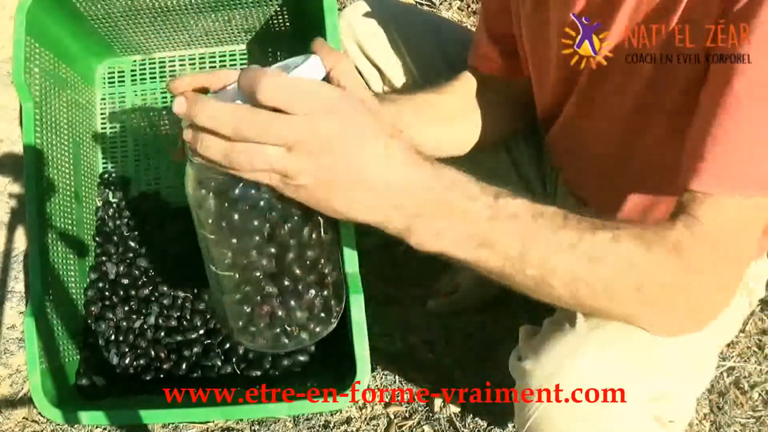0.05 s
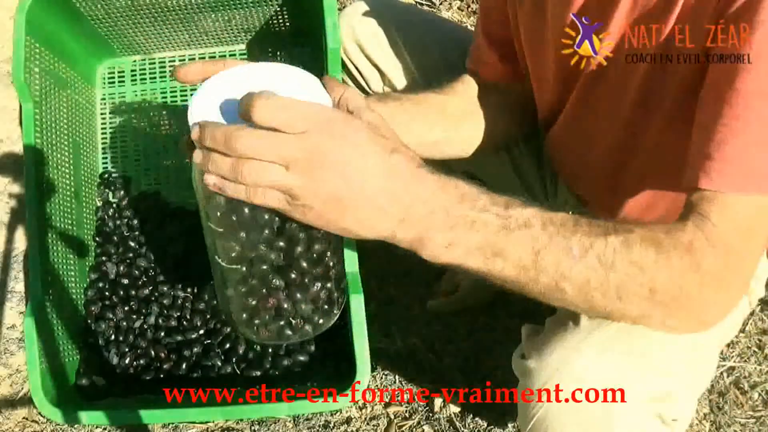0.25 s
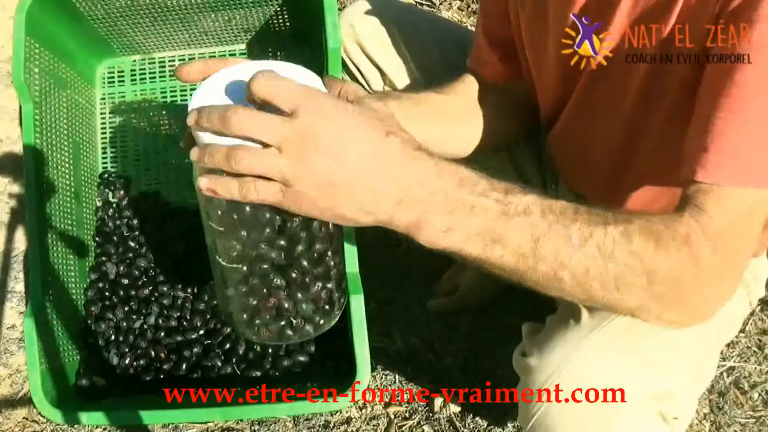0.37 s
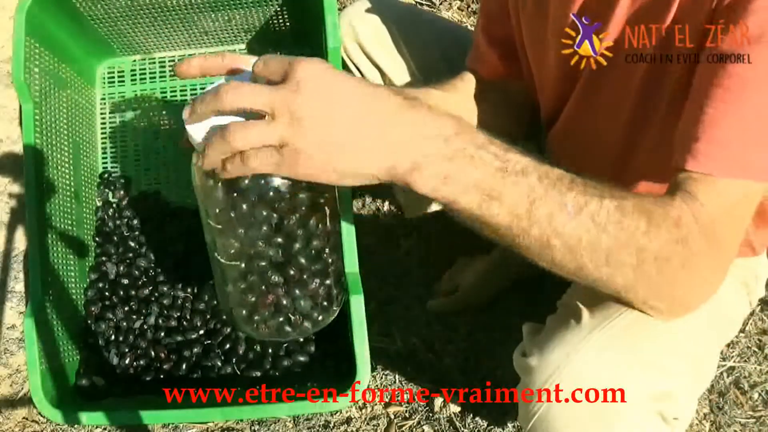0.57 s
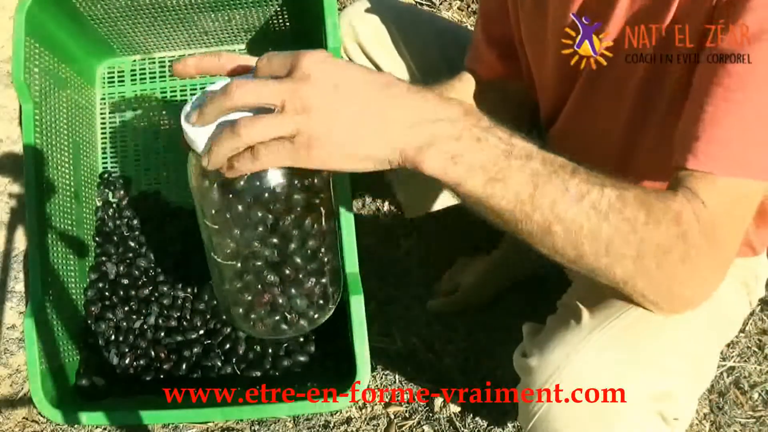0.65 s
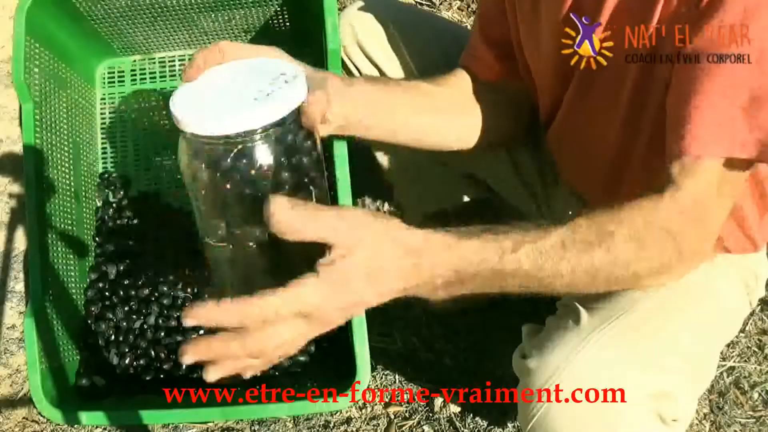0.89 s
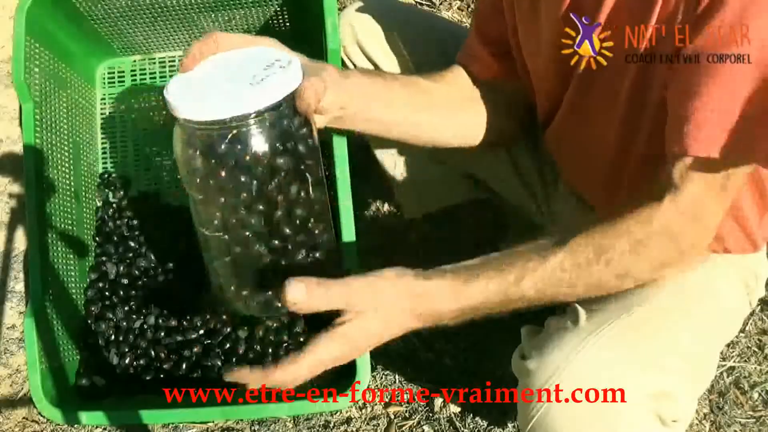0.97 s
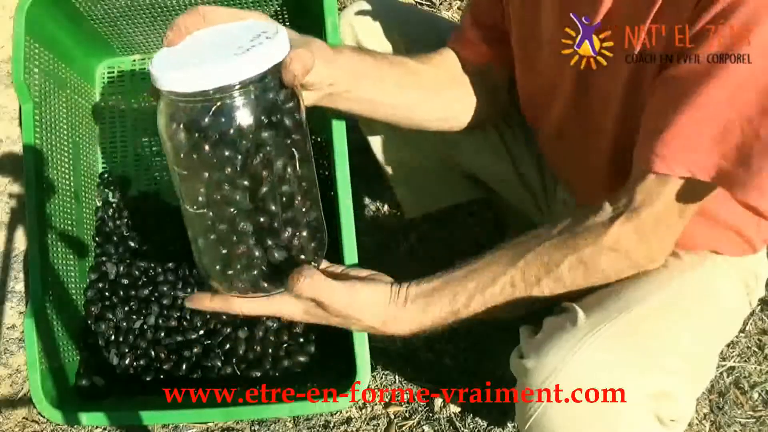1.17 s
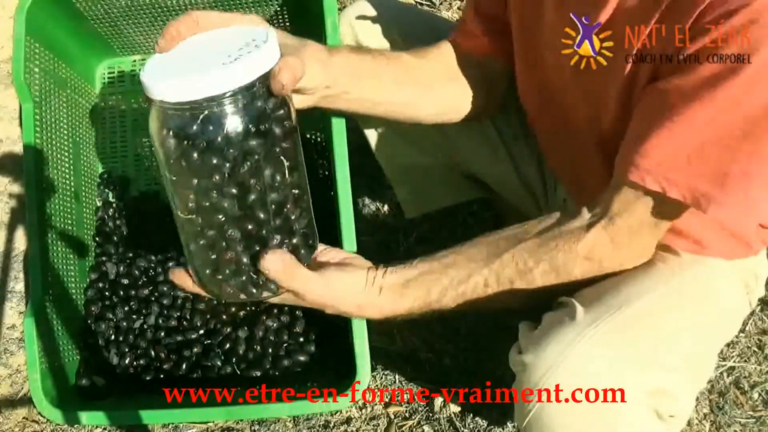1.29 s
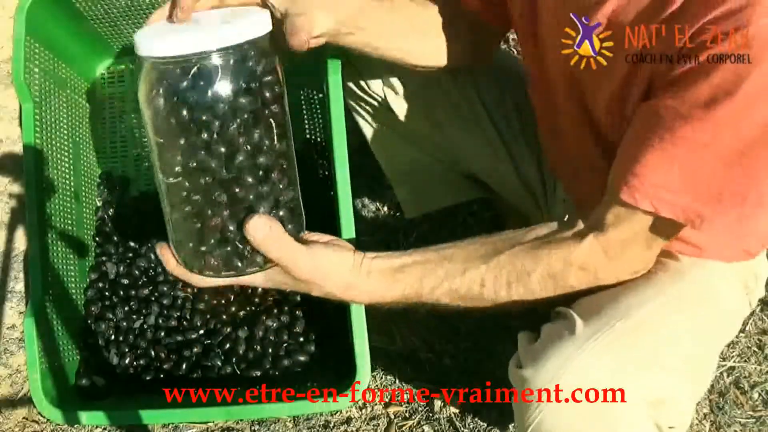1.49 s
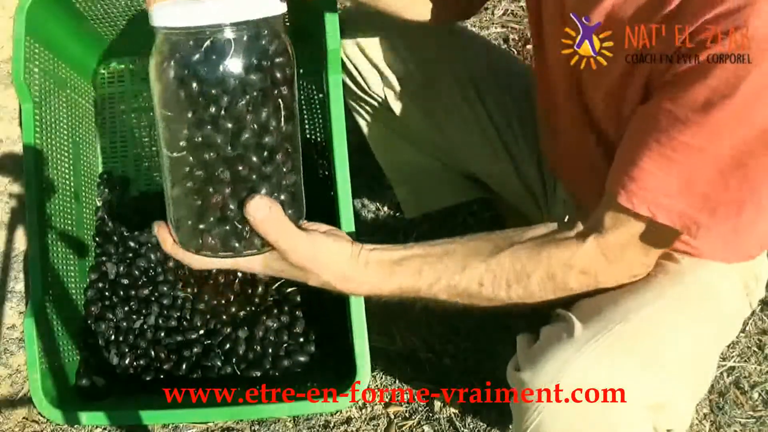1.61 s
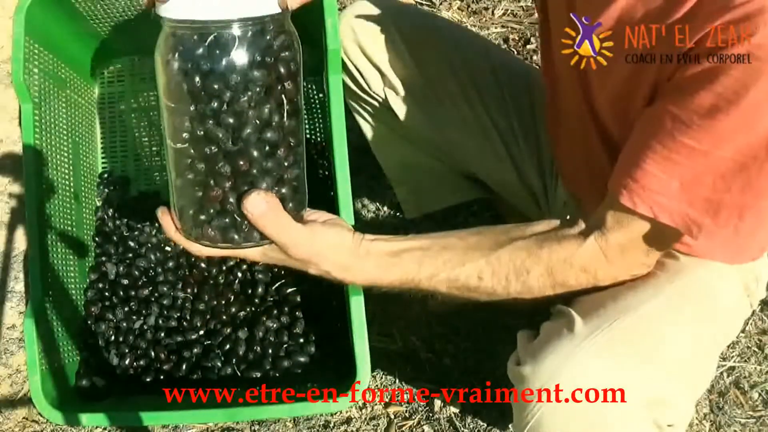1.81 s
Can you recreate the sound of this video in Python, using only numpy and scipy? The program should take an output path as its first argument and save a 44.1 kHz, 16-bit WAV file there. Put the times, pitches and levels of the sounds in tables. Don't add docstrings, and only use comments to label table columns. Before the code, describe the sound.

A sheet-metal lid taps sharply on a glass jar rim, drops onto the thread, chatters and scrapes as it turns, then dulls to small ticks; soft sleeve rustle follows, close microphone outdoors in faint air.

```python
import sys
import numpy as np
from scipy import signal
from scipy.fft import rfft, irfft, next_fast_len
from scipy.io import wavfile
from scipy.ndimage import uniform_filter1d, map_coordinates

SR = 44100
rng = np.random.default_rng(int(sys.argv[2]) if len(sys.argv) > 2 else 0)


def gain_from_decibels(decibels):
    exponent = np.asarray(decibels, float) / 20
    return 10 ** exponent


def generate_wav(signal):
    frames = np.transpose(np.atleast_2d(signal))
    scaled = np.clip(frames, -1, 1) * 32767
    pcm = np.round(scaled).astype(np.int16)
    wavfile.write(sys.argv[1], SR, pcm)


N = 81585


def unit(x):
    return x / np.sqrt(np.mean(x ** 2) + 1e-20)


def along(points, hz):
    point_hz, value = np.transpose(points)
    return np.interp(np.log(hz + 1), np.log(point_hz + 1), value)


def curve(rows, outside=None):
    start_s, value = np.transpose(rows)
    return np.interp(np.arange(N) / SR, start_s, value, outside, outside)


def wobble(rate_hz):
    knots = rng.standard_normal(N // 50)
    return map_coordinates(knots, [np.arange(N) * rate_hz / SR])


def filtered(x, response):
    size = next_fast_len(N + 8192)
    hz = np.fft.rfftfreq(size, 1 / SR)
    return irfft(rfft(x, size) * response(hz), size)[..., :N]


def highpass(x, hz):
    return signal.sosfilt(signal.butter(3, hz, "high", fs=SR, output="sos"), x)


def ring(modes, best_hz, fall_db, crack_db, grip_db=0):
    t = np.arange(SR // 5) / SR
    hz, level_db, t60_s = np.transpose(modes)[:, :, None]
    level_db = level_db - fall_db * abs(np.log2(hz / best_hz))
    sign = (-1) ** np.arange(len(hz))[:, None]

    crack_t60_s, shimmer_t60_s, shimmer_db, dullness = 0.0044, 0.035, -13, 0.56
    fade = gain_from_decibels(-60 * t / crack_t60_s) + gain_from_decibels(shimmer_db - 60 * t / shimmer_t60_s)
    crack = highpass(rng.standard_normal(len(t)) * fade, 1550)
    crack = signal.lfilter([1 - dullness], [1, -dullness], crack)

    blur, crowded_hz = 0.0015, 6500
    line_width_hz = blur * hz * (1 + (hz / crowded_hz) ** 6)
    steps = rng.standard_normal((len(hz), len(t)))
    drift = np.cumsum(steps, axis=1) * np.sqrt(2 * np.pi * line_width_hz / SR)
    tones = sign * gain_from_decibels(level_db - 60 * t / t60_s) * np.sin(2 * np.pi * hz * t + drift)

    grip_s, swell_s = 0.033, 0.0014
    grip = gain_from_decibels(-grip_db / (1 + np.exp((grip_s - t) / 0.002)))
    swell = 1 - np.exp(-t / swell_s)
    return grip * swell * tones.sum(axis=0) + gain_from_decibels(crack_db) * crack


def chatter(chatter_s):
    t = np.arange(SR // 25) / SR
    slips_per_s, scatter_db, grit_db = 900, 1, -12.5
    when = rng.random(len(t))
    size = rng.standard_normal(len(t))
    grit = gain_from_decibels(grit_db) * rng.standard_normal(len(t))
    slips = (when < slips_per_s / SR) * np.sign(size) * gain_from_decibels(scatter_db * (abs(size) + 3.5))
    push = slips + grit
    push[0] = 1
    return push * np.exp(-(t / chatter_s) ** 2)


def evened(modes, push):
    t = np.arange(len(push)) / SR
    even = []
    for hz, level_db, t60_s in modes:
        drive = abs(push @ np.exp(2j * np.pi * hz * t)) / np.linalg.norm(push)
        even.append((hz, level_db - 20 * np.log10(drive + 0.3), t60_s))
    return even


def contacts(table, modes, fall_db, grip_db=0):
    out = np.zeros(N + SR)
    for start_s, level_db, chatter_s, best_hz, crack_db in table:
        push = chatter(chatter_s)
        body = ring(evened(modes, push), best_hz, fall_db, crack_db, grip_db)
        sound = signal.fftconvolve(push, body)
        out[round(start_s * SR):][:len(sound)] += gain_from_decibels(level_db) * sound / abs(sound).max()
    return out[:N]


# pitch_hz, level_db, t60_s (time to fade by 60 dB)
LOOSE_LID = [(292, -5, 0.064), (365.3, -19, 0.44), (893, -6.5, 0.15), (1379, -17.5, 0.09),
             (1784, -4.5, 0.093), (2239, -3.5, 0.064), (2775, -13, 0.12), (3610, -16, 0.06),
             (4180, -12, 0.064), (4926, -6, 0.034), (6200, -16.5, 0.036), (7940, -24, .025),
             (8420, -11.5, 0.076), (10100, -16, 0.033)]
# start_s, level_db (peak), chatter_s, best_hz (pitch rung most), crack_db
RIM_TAPS = [
    (.197, -38, 0.0031, 635, -26),
    (.2375, -29, 0.0044, 4900, 11.5),
    (.2405, -5.5, 0.0034, 1900, -1.5),
    (.2440, -8, 0.0014, 1708, -5.5),
    (.2898, -3, 0.0013, 1150, 5.5),
    (.2935, -33.5, 0.0045, 1330, -3),
]


def tap_rim():
    return contacts(RIM_TAPS, LOOSE_LID, fall_db=5.5, grip_db=10)


# pitch_hz, level_db, t60_s
SEATED_LID = [(294, 3.5, 0.065), (339.6, 2.5, 0.067), (872, 0, 0.045), (1324, 5, 0.013), (1790, -7, 0.048),
              (2300, 1.5, 0.037), (2785, -14, 0.025), (3305, -2, 0.044), (4260, 3.5, 0.015),
              (6630, 24, 0.0067), (8140, 0.5, 0.03)]
# start_s, level_db (peak), chatter_s, best_hz, crack_db
THREAD_DROPS = [
    (.4025, -18.5, 0.011, 2160, 4),
    (.4090, -6.5, 0.003, 2490, 28),
    (.4112, -9.5, 0.0016, 895, 6.5),
    (.4135, -12, .0012, 3400, 7),
    (.4160, -12, 0.0016, 590, 10),
    (.4235, -24.5, 0.0034, 322, -22),
    (.437, -35.5, 0.0021, 1500, -10),
    (.4716, -33, 0.001, 1680, -8),
    (.4976, -46, 0.0024, 1800, 6),
    (.5375, -39, 0.0022, 2300, 16),
]


def drop_on_thread():
    return contacts(THREAD_DROPS, SEATED_LID, fall_db=4.0)


# pitch_hz, level_db, t60_s
TIGHT_LID = [(221.5, -1, 0.036), (388, -4.5, 0.065), (650, -8.5, 0.032), (836, -2, 0.045),
             (1305, -5.5, 0.024), (1587, -2.5, 0.037), (1917, 4.5, 0.013), (2320, -4, 0.024),
             (2810, -10, 0.021), (3380, 4, 0.017), (4170, 1.5, 0.018), (5070, -3, 0.019), (7680, 2, 0.014),
             (9240, -1, 0.019)]
# start_s, level_db (peak), chatter_s, best_hz, crack_db
THREAD_JUMPS = [
    (.5875, -27.5, 0.0029, 398, -2),
    (.5935, -16.5, 0.004, 3050, 2),
    (.5992, -6, 0.00083, 1940, 9.5),
    (.6032, -4.5, 0.0024, 3400, 7.5),
    (.6053, -11.5, 0.0013, 1600, 7),
    (.6095, -17.5, 0.0014, 934, 24),
    (.620, -30.5, 0.0031, 2000, -7),
    (.6388, -19, 0.0028, 2780, 2.5),
]


def jump_along_thread():
    return contacts(THREAD_JUMPS, TIGHT_LID, fall_db=2.0)


# pitch_hz, level_db, t60_s
SEALED_LID = [(231, -0.5, 0.047), (409, -6, 0.044), (828, -2, 0.033), (1305, -3.5, 0.014),
              (1790, 10.5, 0.0066), (2320, -4.5, 0.019), (3386, -9.5, 0.031), (3730, -12, 0.02),
              (4410, -17, 0.014), (5760, -11, .018), (7370, 1.5, 0.0136), (8460, -5.5, 0.034)]
# start_s, level_db (peak), chatter_s, best_hz, crack_db
SEAL_LANDINGS = [
    (.6692, -9.5, 0.00078, 1790, -7),
    (.6725, -12.5, 0.00033, 820, 6),
    (.6752, -12.5, 0.0012, 895, 2.5),
    (.6915, -23.5, 0.0021, 1500, 2),
    (.6965, -30, 0.0073, 328, -15),
    (.708, -35.5, 0.0026, 1490, -14),
]


def land_on_seal():
    return contacts(SEAL_LANDINGS, SEALED_LID, fall_db=3.5)


# start_s, level_db (pressure)
TURNING = [(.33, -75), (.38, -49), (.4, -35), (.44, -76), (.46, -100), (.5, -52.5), (.552, -47.5),
           (.563, -82.5), (.576, -40), (.597, -31.5), (.63, -63), (.655, -44), (.668, -39), (.72, -50.5),
           (.76, -61), (.87, -64.5), (.91, -51), (.925, -89)]


def scrape():
    slips = rng.standard_normal(N) * gain_from_decibels(7 * rng.standard_normal(N) + 3.5 * wobble(250))
    early = unit(signal.fftconvolve(slips, ring(LOOSE_LID, 1500, fall_db=-0.5, crack_db=11))[:N])
    late = unit(signal.fftconvolve(slips, ring(TIGHT_LID, 1500, fall_db=1.5, crack_db=6.5))[:N])
    tightness = np.clip((np.arange(N) / SR - 0.555) / 0.028, 0, 1)
    pressure = gain_from_decibels(curve(TURNING, outside=-73.0))
    return pressure * (np.sqrt(1 - tightness) * early + np.sqrt(tightness) * late)


# start_s, level_db (peak), chatter_s, best_hz, crack_db
RIM_SLIPS = [
    (.3585, -29.5, 0.0056, 1790, -27),
    (.374, -33.5, 0.014, 900, -25),
]


def slip_on_rim():
    held_lid = [(hz, level_db, 0.45 * t60_s) for hz, level_db, t60_s in LOOSE_LID]
    return contacts(RIM_SLIPS, held_lid, fall_db=27)


# pitch_hz, level_db, t60_s
CLOSED_LID = [(340.6, 3, 0.087), (580, -19.5, 0.068), (858, 3, 0.039), (1350, -9, 0.048), (1680, 8, 0.019),
              (2300, -12, 0.035), (3246, 4.5, 0.017), (3960, -12, 0.039), (4750, -2, .022),
              (6340, 3.5, 0.032)]
# start_s, level_db (peak), chatter_s, best_hz, crack_db
SEAL_CREEPS = [
    (.7612, -36, 0.00099, 1680, -16),
    (.8645, -30.5, 0.0026, 3900, -13),
    (.8665, -30.5, 0.0021, 470, 1.5),
    (.8705, -35, 0.0015, 704, 0),
    (.8765, -34.5, 0.0036, 900, 3.5),
    (.8908, -29.5, 0.00083, 1720, -12),
    (.900, -44, 0.0025, 1090, -5),
    (.907, -40, 0.0066, 900, -20),
]


def creep_tight():
    return contacts(SEAL_CREEPS, CLOSED_LID, fall_db=7.5)


# pitch_hz, level_db, t60_s
FULL_JAR = [(252, 3, 0.035), (346.5, -2, 0.04), (866, 0.5, 0.04), (1393, -5.5, 0.036), (1995, -5, .025),
            (2313, -7.5, 0.035), (3290, -3, 0.022), (4203, -5, 0.032), (4900, -6.5, 0.025),
            (6160, -10.5, 0.022), (6490, -3, 0.026), (8060, -3.5, 0.035)]
# start_s, level_db (peak), chatter_s, best_hz, crack_db
JAR_KNOCKS = [(1.441, -41, 0.0018, 600, -17.5), (1.465, -39, 0.002, 326, -26),
              (1.5525, -39.5, 0.0026, 330, -29.5), (1.5632, -29, 0.0014, 3100, -7),
              (1.5657, -25, 0.0015, 4000, -4), (1.5735, -36.5, 0.0017, 400, -18),
              (1.608, -51, 0.011, 1870, 2), (1.642, -40.5, 0.012, 7500, -12), (1.665, -48.5, 0.01, 3180, 2),
              (1.768, -40, 0.0018, 5160, 1.5), (1.785, -45.5, 0.0019, 340, -29),
              (1.835, -47.5, 0.005, 2720, -11)]


def knock_jar():
    return contacts(JAR_KNOCKS, FULL_JAR, fall_db=10.0)


# pitch_hz, level_db
LEFT_OVER_RIGHT = [(300, 0.2), (3000, 2.5), (10000, 2.5)]
# pitch_hz, level_db
PORT_DIFFERENCE = [(300, -27), (2000, -18), (5000, -10), (10000, -12)]


def place(x):
    t = np.arange(SR // 5) / SR
    yard_t60_s, near_t60_s, yard_db = 0.15, 0.012, -15
    tails = rng.standard_normal((2, len(t))) * gain_from_decibels(-60 * t / yard_t60_s)
    near = rng.standard_normal(len(t)) * gain_from_decibels(-60 * t / near_t60_s)
    wet = signal.fftconvolve(x[None], tails / np.linalg.norm(tails[0]), axes=1)[:, :N]
    scattered = signal.fftconvolve(x, near / np.linalg.norm(near))[:N]
    side = filtered(scattered, lambda hz: gain_from_decibels(along(PORT_DIFFERENCE, hz)))
    halves = np.array([[0.5], [-0.5]])
    direct = filtered(x, lambda hz: gain_from_decibels(along(LEFT_OVER_RIGHT, hz) * halves))
    return direct + side * np.array([[1], [-1]]) + gain_from_decibels(yard_db) * (wet.mean(axis=0) + 0.74 * wet)


# pitch_hz, likeness (0-1)
LIKENESS = [(60, 0.97), (300, 0.85), (1000, 0.051), (8000, 0.8)]


def rush(spectrum, patchy_db):
    grains = signal.stft(rng.standard_normal((2, N)), nperseg=512)[2]
    patches = uniform_filter1d(rng.standard_normal(grains.shape[1:]), size=6, axis=0)
    patches = unit(uniform_filter1d(patches, size=8, axis=1))
    pair = signal.istft(grains * gain_from_decibels(patchy_db * patches), nperseg=512)[1][:, :N]

    def middle_and_side(hz):
        turn = np.arccos(np.clip(along(LIKENESS, hz), 0, 1)) / 2
        return gain_from_decibels(along(spectrum, hz)) * [np.cos(turn), np.sin(turn)]

    mid, side = filtered(pair, middle_and_side)
    return unit(np.array([mid + side, mid - side]))


# start_s, level_db
ARM_MOVES = [(0, -118), (.08, -54), (.12, -92), (.8, -63.5), (.86, -54.5), (.92, -58.5), (.98, -53),
             (1.09, -63.5), (1.13, -53), (1.22, -55.5), (1.28, -59.5), (1.38, -54.5), (1.42, -65.5),
             (1.53, -55), (1.65, -52.5), (1.73, -62), (1.85, -65)]
# pitch_hz, level_db (per Hz)
CLOTH_COLOR = [(880, -9), (1500, -5), (4320, -6.5), (6090, -5.5), (8570, -5), (11000, -15.5),
               (14300, -58.5), (22000, -120)]


def rustle():
    return gain_from_decibels(curve(ARM_MOVES) + 1.6 * wobble(39.15)) * rush(CLOTH_COLOR, patchy_db=0.54)


# start_s, level_db
WIND = [(0, -66.5), (.9, -59.5), (1.05, -60.5), (1.4, -61), (1.85, -59)]


def breeze():
    rumble_color = [(15, -9), (45, -2), (110, -10), (250, -34.5), (500, -103)]  # pitch_hz, level_db
    return gain_from_decibels(curve(WIND) + 1.1 * wobble(14)) * rush(rumble_color, patchy_db=0.6)


# pitch_hz, level_db (per Hz)
AIR_COLOR = [(59, -26), (100, -5.5), (258, -2.5), (1660, -22.5), (1830, -16.5), (7170, -21.5), (11300, -22),
             (14700, -78.5), (22000, -120)]


def open_air():
    level_db = -57.5 + 0.39 * wobble(10.0) + 1.07 * wobble(29.12)
    return gain_from_decibels(level_db) * rush(AIR_COLOR, patchy_db=-3.0)


def scene():
    lid = tap_rim() + drop_on_thread() + jump_along_thread() + land_on_seal() + scrape()
    small = slip_on_rim() + creep_tight() + knock_jar()
    background = rustle() + breeze() + open_air()
    return place(highpass(lid + small, 150)) + background


def roll_off(x):
    return signal.sosfilt(signal.butter(12, 15780, fs=SR, output="sos"), x)


def record(dry):
    top_hz, over_top_db, last_hz = 11300, -35, 15100

    def shelf(hz):
        above = 1 / (1 + np.exp(np.clip((top_hz - hz) / 120, -50, 50)))
        return gain_from_decibels(over_top_db * above) * (hz < last_hz)

    return roll_off(filtered(dry, shelf))


dry = scene()
out = record(dry)
generate_wav(out)
```